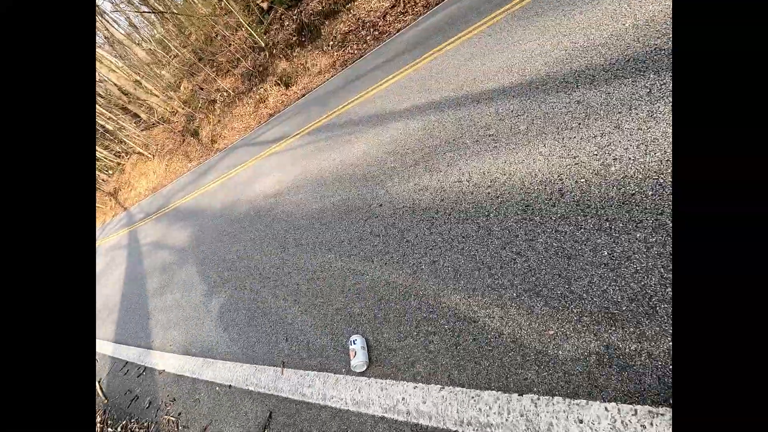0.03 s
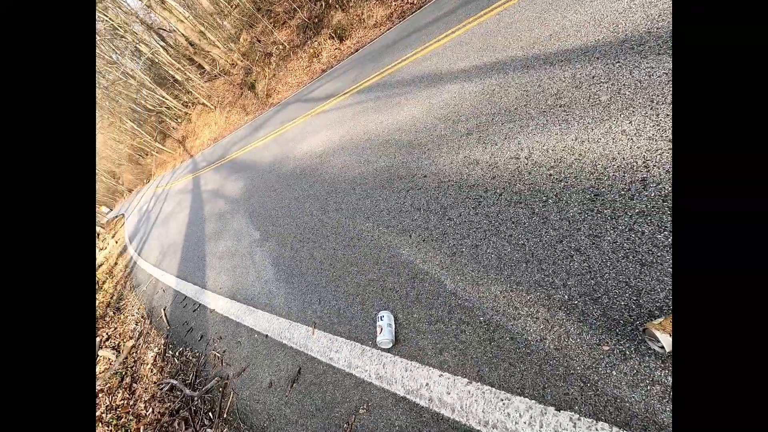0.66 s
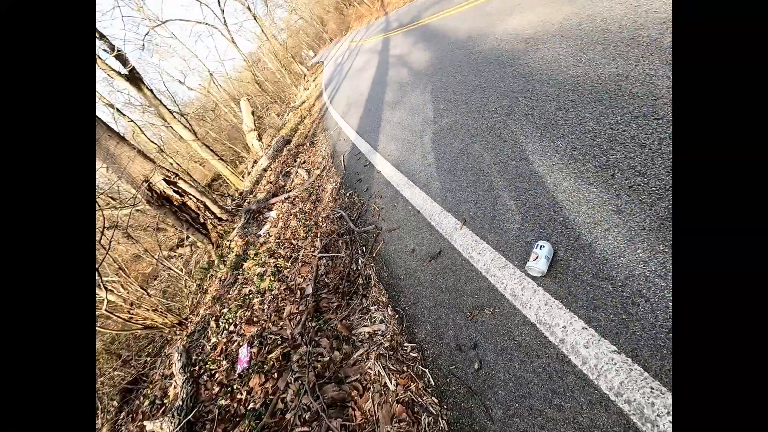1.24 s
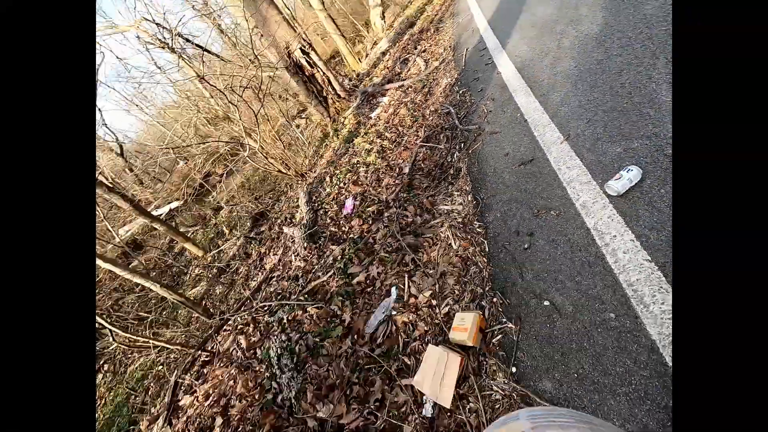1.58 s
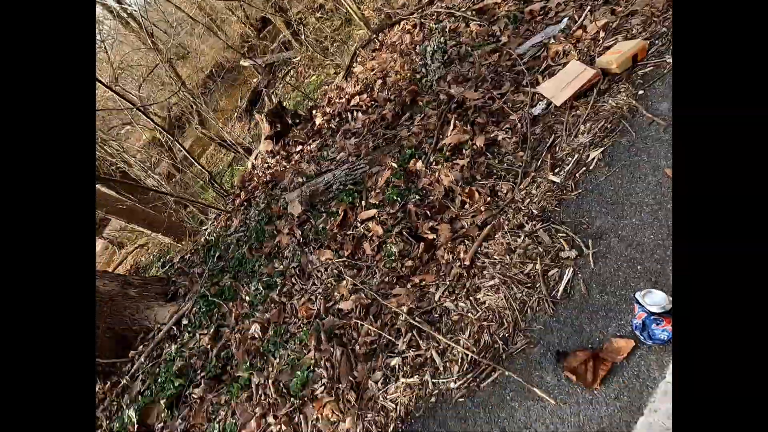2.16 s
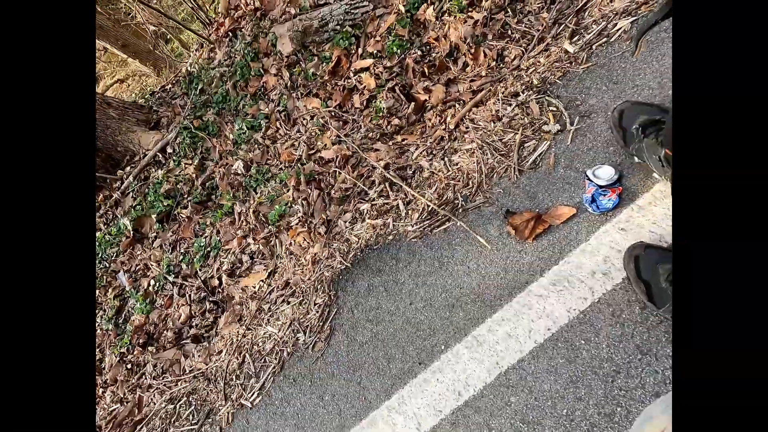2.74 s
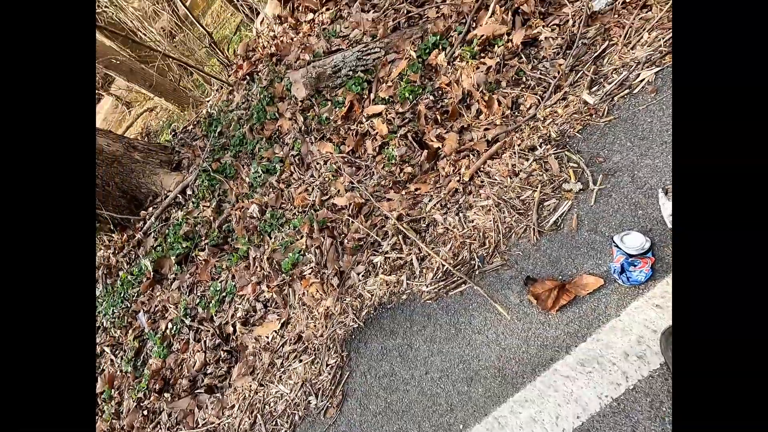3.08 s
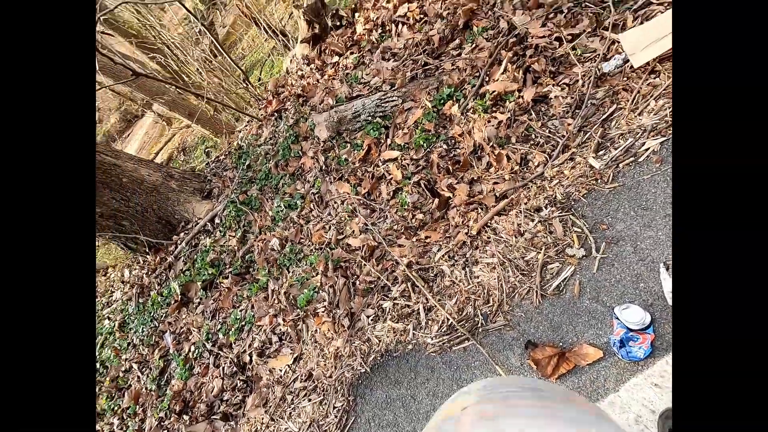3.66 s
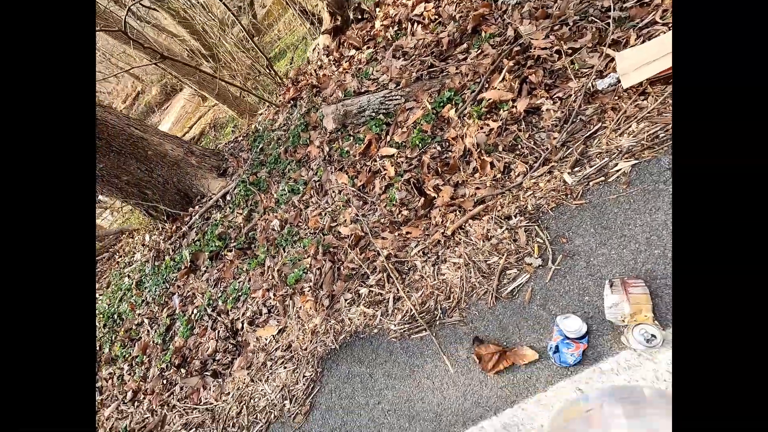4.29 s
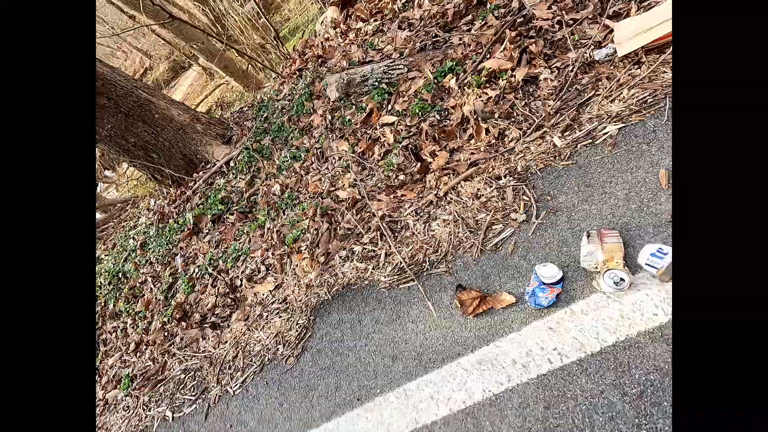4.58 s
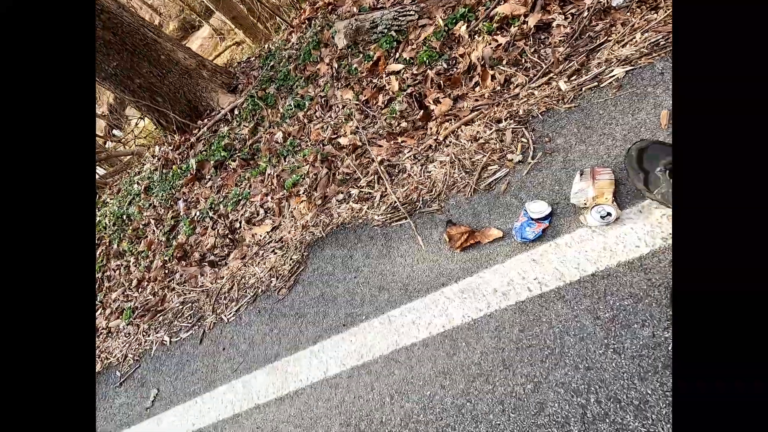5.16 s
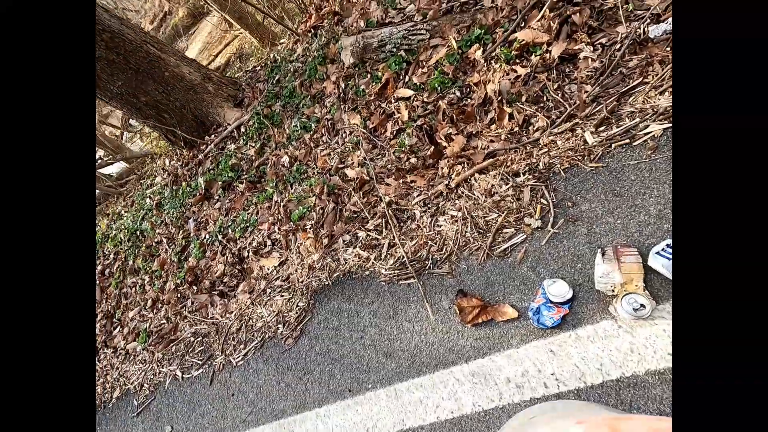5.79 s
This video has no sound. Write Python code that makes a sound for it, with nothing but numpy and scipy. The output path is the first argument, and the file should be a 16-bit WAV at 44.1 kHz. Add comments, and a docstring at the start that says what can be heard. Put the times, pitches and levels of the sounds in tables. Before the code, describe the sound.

On a quiet woodland road, close to the microphone, an empty drink can is kicked and rattles over the asphalt in short tinny bursts, then buckles under a stamping shoe. Another can clonks with a clear hollow tone, rolls and is crushed too, its creased metal ticking as it settles. Gritty shoe scuffs come in between, over a soft wind rumble, faintly ticking leaves and a few distant bird whistles.

```python
"""A shoe thuds and an empty aluminium can clatters along an asphalt road; it is stamped flat, then a
second, rounder can is kicked and stamped. Impacts excite the modes of the thin wall, so each can rings
as it tumbles and rolls; under the shoe it buckles in a burst of snaps, then ticks and settles.
Soles scuff on grit, a light wind rumbles on the microphone, dry leaves tick and a far bird whistles."""
import sys
import numpy as np
from scipy import signal
from scipy.fft import rfft, irfft
from scipy.io import wavfile
from scipy.ndimage import uniform_filter1d

SR = 44100
rng = np.random.default_rng(int(sys.argv[2]) if len(sys.argv) > 2 else 0)


def wav_out(sig):
    """Save sig, one row per channel (or a flat mono array), as 16-bit PCM at SR to the path in sys.argv[1]."""
    wavfile.write(sys.argv[1], SR, np.round(np.clip(np.atleast_2d(sig).T, -1, 1) * 32767).astype(np.int16))


N = 265790

# soles and cans scuffing on grit: start_s, length_s, level_db, body_db, crack_db
GRIT_SCUFFS = [(.002, 0.015, -22, 22.5, -6), (0.58, 0.016, -30.5, 22, -8), (0.74, 0.0086, -34, 7, 6),
               (1.014, 0.024, -29.5, 28, 8.5), (1.471, 0.013, -32, 38, 20), (1.492, 0.12, -50.5, -17, 10),
               (1.605, 0.027, -32, 21.5, -6), (1.807, 0.01, -46, 16, 19), (1.982, 0.011, -40, 34, 11),
               (3.015, 0.049, -32, 15, 11), (3.554, 0.031, -48, 12, -18), (3.967, 0.0065, -40, 6, 31),
               (4.038, .011, -30.5, 40, 10), (4.157, 0.035, -39, 24.5, 1)]
# the foot's weight landing: start_s, level_db, pitch_ratio, ground_push_db
FOOTFALLS = [(.001, -19, 0.61, -17), (0.734, -28, .91, -42), (1.473, -25, 0.8, -45), (2.74, -26, 1.1, -41),
             (2.79, -25, 1.1, -33), (3.002, -5, 1.01, -27), (3.115, -31, 1.1, -31),
             (4.041, -28.5, 1.5, -44), (5.218, -18.5, 1.5, -44)]
# modes of a sole on a flat can: pitch_hz, level_db, t60_s
FOOT_MODES = [(148.2, -8.5, 0.19), (166, -10.5, 0.14), (211.4, 2, 0.11), (574, -14, 0.14),
              (740, -14, 0.075), (950, -11, .11)]
# spectrum of thin aluminium when struck: frequency_hz, level_db
WALL_SPECTRUM = [(60, -16.5), (250, -14.5), (400, -14), (600, -6), (900, 0.5), (1500, 2), (2300, -3),
                 (3500, -7.5), (5000, -14), (7000, -24), (9000, -33.5), (12500, -36.5), (15000, -52.5)]
# part of an impact that differs between the ears: frequency_hz, side_ratio
STEREO_SPREAD = [(100, 0.033), (700, 0.038), (2000, 0.22), (4500, 0.13), (8000, 0.46), (13000, 0.58)]
# clear knocks and snaps of the metal: start_s, level_db, panel_hz, t60_s, crack_db
PANEL_KNOCKS = [(.003, -18, 691, 0.027, 1.5), (.042, -20.5, 2850, 0.049, -15.5),
                (.091, -21, 875, 0.074, -2.5), (.131, -22, 915, 0.066, 5.5), (0.162, -17, 2180, 0.048, 2.5),
                (.206, -28.5, 4030, .033, -9), (.229, -23.5, 682, 0.18, -9),
                (.262, -19.5, 2180, 0.067, -16), (0.29, -25.5, 2620, 0.1, -14),
                (0.318, -29.5, 1440, 0.014, 3), (.361, -33, 2270, 0.053, -5), (.378, -27, 4340, 0.085, -8),
                (.408, -20.5, 2610, 0.1, -20), (.427, -21, 3640, 0.017, 3), (.484, -20.5, 2610, 0.043, 12),
                (.506, -24, 636, 0.063, -8), (0.573, -26.5, 667, 0.055, -15), (.588, -22.5, 716, .04, -6),
                (.618, -24.5, 4000, 0.093, -2), (.702, -16.5, 3540, 0.076, -6.5),
                (.784, -29, 1380, 0.015, 1), (1.053, -20.5, 670, 0.066, -1.5), (1.06, -22, 1550, 0.1, -13),
                (1.115, -37, 2040, .012, -11), (1.148, -28.5, 4120, 0.056, -23),
                (1.207, -38, 1070, 0.016, -9), (1.39, -32.5, 3470, .06, -31), (1.405, -20, 1175, .043, 2.5),
                (1.429, -25.5, 1220, 0.19, -8), (1.472, -23.5, 3090, 0.047, 4.5),
                (2.237, -22.5, 3740, 0.035, 2.5), (2.258, -27, 770, .049, -8),
                (2.287, -31.5, 4460, .042, 7), (2.344, -17.5, 3580, 0.023, 1.5),
                (2.385, -27, 939, 0.071, -13), (2.425, -23, 1150, 0.033, -8),
                (2.444, -28.5, 1130, 0.013, 4), (2.562, -24.5, 940, .033, -23),
                (2.576, -32, 1160, 0.021, -21), (2.607, -19.5, 925, 0.05, -26),
                (2.836, -18.5, 810, 0.022, 6), (2.905, -33, 950, 0.016, 17), (3.078, -29.5, 2370, 0.12, 13),
                (3.115, -23.5, 1415, 0.073, 9), (3.134, -23, 3300, 0.018, 20.5),
                (3.182, -27.5, 2710, 0.092, 12), (3.215, -38, 2100, 0.028, -5),
                (3.232, -40, 1860, 0.021, 1), (3.308, -36, 2130, 0.033, -2), (3.318, -37.5, 2000, .021, -5),
                (4.028, -22.5, 1350, .08, -3), (4.162, -33.5, 864, 0.016, -8),
                (4.752, -21.5, 666, 0.032, -8.5), (4.795, -20, 5000, 0.032, 17), (4.81, -18.5, 840, .05, 1),
                (5.344, -22, 1680, 0.037, 14), (5.353, -34, 1760, 0.023, 16),
                (5.394, -21.5, 1710, 0.036, 7.5), (5.441, -21.5, 1650, 0.017, 16),
                (5.524, -22.5, 1950, 0.067, 3.5), (5.552, -27, 1820, 0.11, 12.5),
                (5.596, -22, 2840, 0.087, 0.5), (5.633, -24, 2180, .057, 12), (5.673, -37, 1750, 0.15, -9)]
# modes of each can: pitch_hz, level_db, t60_s
DENTED_MODES = [(577, -2.5, 0.15), (664, -5, 0.11), (723, -1.5, 0.089), (892, 6.5, 0.11), (991, 2, 0.051),
                (1073, 5, 0.086), (1200, 1, 0.081), (1346, 1, 0.04), (1509, 0.5, 0.095), (1778, 2, 0.04),
                (2130, -12, 0.11), (2570, -13, 0.054), (2850, -12, 0.11), (3240, -12, 0.051),
                (3430, -10.5, 0.015), (4200, -31, .06)]
ROUND_MODES = [(332, -10, 0.16), (651.5, 1, 0.19), (818, -2, 0.34), (954, -11.5, 0.16), (1169, -8.5, 0.14),
               (1239, -5, 0.11), (1554, -15.5, 0.12), (1600, -18, 0.2), (1696, -11.5, 0.14),
               (1890, -26, 0.15), (2040, -27, 0.082), (2420, -23, 0.06), (2800, -16.5, 0.11),
               (3250, -30, 0.14), (4020, -40, 0.052)]
# runs of each can over the road: start_s, length_s, ring_db, rasp_db
DENTED_RUNS = [(.01, .12, -42, -29), (0.162, 0.2, -25, -29.5), (0.402, .13, -20.5, -26),
               (0.569, 0.078, -28, -30), (0.723, 0.14, -40.5, -39.5), (1.043, 0.02, -21.5, -27),
               (1.11, 0.14, -41, -42), (1.381, 0.099, -38, -34.5), (2.242, 0.18, -33.5, -33),
               (2.372, 0.093, -22, -27), (2.459, 0.073, -27.5, -34.5), (2.553, 0.061, -16, -23.5),
               (2.686, 0.11, -28, -32)]
ROUND_RUNS = [(3.923, 0.12, -25, -25.5), (4.131, 0.08, -48, -37.5), (4.757, 0.15, -29.5, -27),
              (4.886, 0.092, -23, -20.5), (4.99, 0.07, -31.5, -28.5), (5.073, .135, -29.5, -34.5),
              (5.211, 0.033, -26, -12)]
# rasp of each can on the road: frequency_hz, level_db
DENTED_RASP_SPECTRUM = [(100, -17), (400, -9.5), (900, -2), (1600, -5), (3000, -3), (5000, -12.5),
                        (8000, -17.5), (12500, -29.5), (15000, -44)]
ROUND_RASP_SPECTRUM = [(100, -23), (400, -11), (900, 9), (1600, 5.5), (2800, 1), (5000, -5), (8000, -24.5),
                       (12500, -35), (15000, -45)]
# strength of the wind on the microphone: time_s, level_db
WIND_LEVEL = [(0, -43), (.4, -51), (1.2, -43.5), (1.9, -37.5), (2.4, -40), (2.8, -44.5), (3.5, -46.5),
              (4.1, -41), (4.6, -41.5), (5.2, -45), (5.6, -51), (6.03, -45.5)]
# spectra of the wind, the hush of the woods and the ticking leaves: frequency_hz, level_db
WIND_SPECTRUM = [(10, -6.5), (25, -6.5), (55, 2), (100, -9), (170, -10), (300, -27.5), (600, -30.5),
                 (2000, -101)]
HUSH_SPECTRUM = [(40, 2), (300, 4.5), (600, 1), (1000, 4), (1600, -2.5), (2500, -9.5), (4000, -14.5),
                 (7000, -22), (8500, -32.5), (12500, -39), (15000, -47)]
LITTER_SPECTRUM = [(200, -6), (800, 1), (2500, -3), (6000, -15), (12000, -30), (15000, -44)]
# folds of a can under the shoe: start_s, length_s, crunch_db, blow_db, hollow_hz, body_db, crack_db
FOLDS = [(.716, 0.022, -18.5, -23.5, 1280, 9, 10), (2.735, 0.018, -16.5, -21, 1700, 16.5, 6),
         (2.769, 0.024, -21, -21, 1248, 22.5, 19), (2.795, .034, -18, -24, 1032, 19.5, 24),
         (2.985, 0.0067, -25.5, -36, 1230, 23, 12), (2.995, .016, -19.5, -25, 1736, 21.5, 12.5),
         (5.218, 0.027, -18, -15, 670, 17.5, 16), (5.245, 0.0068, -20, -23.5, 5300, 23, 19),
         (5.265, 0.038, -18.5, -16, 742, 15, 12), (5.309, 0.026, -19, -20, 920, 5.5, 15.5)]
# a far bird's falling whistles: start_s, length_s, first_hz, last_hz, level_db
BIRD_WHISTLES = [(0.885, 0.11, 3130, 2062, -52), (1.235, 0.09, 2920, 2020, -50.5),
                 (1.589, 0.1, 2810, 2150, -51.5)]
# blows that ring the whole round can: start_s, level_db, favoured_hz, favour_db
ROUND_BLOWS = [(3.935, -38, 827, 8), (4.032, -32, 947, 21), (4.753, -23, 823, 0), (4.81, -18.5, 823, 1.5),
               (4.868, -41, 646, 11.5), (5.076, -35, 823, 0)]
# where the cans lie: time_s, left_minus_right_db
CAN_BEARING = [(0, -0.5), (1.2, -1.5), (2.3, -3), (2.8, -3), (3.05, -2), (4.1, -0.3), (4.8, -3.6),
               (5.3, -3.5), (5.599, -4.5)]
# level difference of the microphone ports: frequency_hz, left_minus_right_db
PORT_LEVEL_GAP = [(60, 0.5), (110, -1), (200, 1), (370, 1), (680, 1), (1250, 0), (2300, 0), (4230, 0),
                  (7760, 0.5), (14200, 4.5)]
# phase difference of the ports: frequency_hz, left_minus_right_rad
PORT_PHASE_GAP = [(50, 0.21), (500, -0.26), (1000, -0.17), (2000, -0.35), (3500, -0.83), (4700, -0.63),
                  (6600, -0.76), (7900, 1), (9500, 0.47), (14000, 0)]

FLATTENED_S = 2.77  # the dented can stops ringing as a whole
BURST_SAMPLES = 7000
BODY_DB, BODY_DB_PER_OCTAVE, BODY_AT_HZ = 5, -3.5, 1040
SNAP_DB, SNAP_T60 = -0.5, 0.014  # the wall's first, violent flexing, relative to its shiver
SHIMMER_DB, SHIMMER_T60, SHIMMER_HZ = -22, 0.24, 4500  # the duller, longer tail of a knock
FACET_DB, FACET_HZ, FACET_CYCLES = -17.5, (1102, 5197), 145  # small faces between the dents
GRAZE_S, GRAZE_DB, GRAZE_T60, GRAZE_CRACK_DB = 0.006, -19, 0.037, -11  # a touch just before a strike
ROLL_RISE_S, ROLL_SAG_DB_PER_S, ROLL_STOP_DB_PER_S = 0.014, 28, 255
RATTLES_PER_S, RATTLE_HZ, RATTLE_DB, RATTLE_SPREAD_DB = 26, (1190, 4430), -5, 2
FOLD_T60, FOLD_CRACK_DB = 0.082, -15.5  # the blow that starts a fold is duller than its crunch
CREAK_S, CREAK_DB, CREAK_BODY_DB, CREAK_CRACK_DB = 0.058, -25, -23, -1.5  # creases tick after a fold


def amp(db):
    """Amplitude ratio of a level in decibels."""
    return 10 ** (np.asarray(db) / 20)


def unit(x):
    """Normalisation to rms 1."""
    return x / np.sqrt(np.mean(x ** 2) + 1e-20)


def read(points, hz):
    """Interpolation of a spectrum on a log-frequency axis."""
    f, value = np.transpose(points)
    return np.interp(np.log(hz + 1), np.log(f + 1), value)


def over_time(curve):
    """Linear interpolation of a curve at every sample."""
    return np.interp(np.arange(N) / SR, *np.transpose(curve))


def add(mix, s, sound):
    """Superposition: a sound joins the mix at time s."""
    part = mix[..., max(0, round(s * SR)):][..., :sound.shape[-1]]
    part += sound[..., :part.shape[-1]]


def coloured(x, spectrum):
    """Spectral shaping of a long signal, at rms 1."""
    return unit(irfft(rfft(x) * amp(read(spectrum, np.fft.rfftfreq(N, 1 / SR))), N))


def dull(x, hz):
    """First-order low-pass filter."""
    keep = np.exp(-2 * np.pi * hz / SR)
    return signal.lfilter([1 - keep], [1, -keep], x)


def flutter(n, hz):
    """Smooth random modulation of rms 1 and bandwidth about hz."""
    smoothing = np.exp(-(np.fft.rfftfreq(n, 1 / SR) / hz) ** 2)
    return unit(irfft(rfft(rng.standard_normal(n)) * smoothing, n))


def grains(n, per_s, spread_db):
    """Poisson process of tiny impacts of unequal size."""
    size = amp(spread_db * np.minimum(rng.exponential(1, n), 4))
    return size * rng.choice([-1, 1], n) * (rng.random(n) < per_s / SR)


def mode(hz, t60):
    """Free vibration of a damped oscillator."""
    t = np.arange(SR // 2) / SR
    return amp(-60 * t / t60) * np.sin(2 * np.pi * hz * t)


def crunch(length, per_s, spread_db, fade_s, hiss, sharp=0.55):
    """Shot noise: snaps go on while the shoe presses, each leaving a brief shiver."""
    t = np.arange(BURST_SAMPLES) / SR
    press = np.minimum(t / 0.0014, 1) * np.exp(-np.maximum(t - length, 0) / fade_s)
    snaps = np.array([unit(grains(len(t), per_s, spread_db)) for ear in range(2)])
    shiver = np.sqrt(dull(snaps ** 2, 210))
    return press * (sharp * snaps + (shiver + hiss) * rng.standard_normal(snaps.shape))


def shell(drive, body_db, crack_db, panel_hz=1000, panel_db=0, panel_octaves=0.39, size=8192):
    """Source and filter: the wall colours a blow; heavy ones add bass body, sharp ones treble crack."""
    hz = np.abs(np.fft.fftfreq(size, 1 / SR))
    db = read(WALL_SPECTRUM, hz) + body_db * read([(400, 1), (1600, 0)], hz)
    db += crack_db * read([(2000, 0), (8000, 1)], hz)
    db += panel_db * np.exp(-(np.log2((hz + 1) / panel_hz) / panel_octaves) ** 2)  # one resonance
    spectrum = np.fft.fft(drive, size)
    power = uniform_filter1d(abs(spectrum) ** 2, size=160, mode="wrap")
    db = db - 10 * np.log10(power + 1e-12)  # short blows are broadly white
    response = np.exp(np.conj(signal.hilbert(db * np.log(10) / 20)))  # minimum phase: follows the blow
    mid, side = spectrum * response
    side = side * read(STEREO_SPREAD, hz)
    return np.fft.ifft([mid + side, mid - side]).real / np.linalg.norm(np.fft.ifft(mid))


def shoes(rise_s=0.01):
    """Friction on grit makes the scuffs; the landing weight excites low, damped modes."""
    out = np.zeros((2, N))
    for s, length, db, body_db, crack_db in GRIT_SCUFFS:
        grit = crunch(length, per_s=1500, spread_db=4.5, fade_s=0.0057, hiss=0.49)
        add(out, s, amp(db) * np.sqrt(length * SR) * shell(grit, body_db, crack_db))
    for s, db, pitch, push_db in FOOTFALLS:
        add(out, s, amp(push_db) * mode(hz=52, t60=0.082))  # dull push through the ground
        thud = sum(amp(mode_db) * mode(hz * pitch, t60) for hz, mode_db, t60 in FOOT_MODES)
        onset = np.minimum(np.arange(len(thud)) / SR / rise_s, 1)
        add(out, s, amp(db) * thud * onset)
    return out


def panel_body(hz):
    """Radiation efficiency: large, low panels push more air, so their knocks gain bass (dB)."""
    return BODY_DB + BODY_DB_PER_OCTAVE * np.log2(hz / BODY_AT_HZ)


def knock(db, hz, t60, crack_db, body_db, rise_s=0.00061, ping_db=-7, ping_cycles=65):
    """Impulse response of the wall: dense modes decay as noise; the panel and nearby facets ping."""
    t = np.arange(BURST_SAMPLES) / SR
    quick, slow = rng.standard_normal((2, 2, len(t)))
    shiver = quick * (amp(-60 * t / t60) + amp(SNAP_DB - 60 * t / SNAP_T60))
    shimmer = dull(slow, SHIMMER_HZ) * amp(SHIMMER_DB - 60 * t / SHIMMER_T60)
    drive = (shiver + shimmer) * np.minimum(t / rise_s, 1)
    drive[0, 0] += 3  # impulse of first contact
    out = shell(drive, body_db, crack_db, hz, panel_db=8)
    low, high = FACET_HZ
    facets = [(low * (high / low) ** u, FACET_DB, FACET_CYCLES) for u in rng.random(3)]
    for ping_hz, share_db, cycles in [(hz, ping_db, ping_cycles)] + facets:
        ping = mode(ping_hz, min(cycles / ping_hz, 2 * t60))  # small panels die sooner
        add(out, 0, amp(share_db) * ping / np.linalg.norm(ping))
    return amp(db) * np.sqrt(0.0062 * SR) * out


def knocks():
    """Impact excitation: the cans hit the road, and creased panels spring back."""
    out = np.zeros((2, N))
    for s, db, hz, t60, crack_db in PANEL_KNOCKS:
        add(out, s, knock(db, hz, t60, crack_db, panel_body(hz)))
        if s < FLATTENED_S:
            graze = knock(db + GRAZE_DB, hz, GRAZE_T60, GRAZE_CRACK_DB, panel_body(hz), rise_s=0.0014)
            add(out, s - GRAZE_S, graze)
    return out


def struck(modes, blows, scatter_db=2):
    """Modal superposition: a blow rings every mode, and the spot hit favours those near one pitch."""
    out = np.zeros(N)
    for s, db, spot_hz, favour_db in blows:
        for k, (hz, mode_db, t60) in enumerate(modes):
            nearness = np.exp(-(np.log2(hz / spot_hz) / 0.035) ** 2)
            gain = amp(db + mode_db + favour_db * nearness + scatter_db * rng.standard_normal())
            add(out, s, (-1) ** k * gain * mode(hz, t60))
    return out


def run_envelopes(runs):
    """Frictional decay: in each run the ring and the rasp pick up quickly, sag and stop."""
    power = np.zeros((2, N))
    for s, length, ring_db, rasp_db in runs:
        t = np.arange(int((length + 0.4) * SR)) / SR
        loss_db = ROLL_SAG_DB_PER_S * t + ROLL_STOP_DB_PER_S * np.maximum(t - length, 0)
        speed = np.minimum(t / ROLL_RISE_S, 1) * amp(-loss_db)
        add(power, s, (amp([[ring_db], [rasp_db]]) * speed) ** 2)
    return np.sqrt(power)


def rolling(modes, runs, rasp_spectrum, rasp_gain_db, taps_per_s, ring_gain_db=-7):
    """Random forcing: road grains tap the turning can, so its modes hum and the contact rasps."""
    bumps = amp(3 * (flutter(N, hz=90) - 0.5))  # the taps come in uneven clumps
    push, scrape = run_envelopes(runs) * bumps
    taps = unit(grains(N, taps_per_s, spread_db=2.5))
    hum = np.zeros(N)
    for hz, db, t60 in modes:
        ring = mode(hz, t60)
        force = push * taps * rng.standard_normal(N)
        hum += amp(db) * signal.oaconvolve(force, ring / np.linalg.norm(ring))[:N]
    hum /= np.linalg.norm(amp(np.transpose(modes)[1]))
    t = np.arange(SR // 2) / SR
    wall = rng.standard_normal(len(t)) * amp(-60 * t / 0.0036)  # crowded high modes, quickly gone
    grit = unit(signal.oaconvolve(taps, wall)[:N])
    rasp = np.array([coloured(grit + 0.41 * rng.standard_normal(N), rasp_spectrum) for ear in range(2)])
    return amp(ring_gain_db) * hum + amp(rasp_gain_db) * scrape * rasp


def dented_can(ring_db=-20):
    """Damped resonance: the first can rolls and rings with every knock until it is flattened."""
    blows = [(s, db + ring_db, hz, 0) for s, db, hz, *_ in PANEL_KNOCKS if s < FLATTENED_S]
    ring = struck(DENTED_MODES, blows)
    roll = rolling(DENTED_MODES, DENTED_RUNS, DENTED_RASP_SPECTRUM, rasp_gain_db=-16.5, taps_per_s=2500)
    return ring + roll


def rattle(most_taps=8):
    """Intermittent contact: the rolling can's dents catch the road in small, uneven taps."""
    out = np.zeros((2, N))
    low, high = RATTLE_HZ
    for s, length, _, rasp_db in DENTED_RUNS:
        for k, (late, softness, panel) in enumerate(rng.random((most_taps, 3))):
            delay_s = (k + late) / RATTLES_PER_S
            hz = low * (high / low) ** panel
            db = rasp_db + RATTLE_DB + RATTLE_SPREAD_DB * (1 - 2 * softness)
            if delay_s < length:
                add(out, s + delay_s, knock(db, hz, t60=0.038, crack_db=-3, body_db=panel_body(hz)))
    return out


def wind_and_hush(hush_db=-55):
    """Turbulence rumbles on the microphone over the broadband hush of the woods."""
    ears = np.array([[1], [-1]])
    wind_mid, wind_side, hush_mid, hush_side = rng.standard_normal((4, N))
    rumble = coloured(wind_mid + 0.18 * ears * wind_side, WIND_SPECTRUM)
    hush = coloured(hush_mid + 0.28 * ears * hush_side, HUSH_SPECTRUM)
    return amp(over_time(WIND_LEVEL)) * rumble + amp(hush_db + 0.39 * flutter(N, hz=39)) * hush


def litter(db=-68, t60=0.02):
    """Sparse shot noise: dry leaves and grit tick faintly at the roadside."""
    t = np.arange(SR // 8) / SR
    ticks = grains(N, per_s=31, spread_db=4)
    tails = rng.standard_normal((2, len(t))) * amp(-60 * t / t60)
    mid, side = (coloured(signal.oaconvolve(ticks, tail)[:N], LITTER_SPECTRUM) for tail in tails)
    return amp(db) * np.array([mid + 0.2 * side, mid - 0.48 * side])


def crushing(hollow_db=10):
    """Buckling: each fold is a blow, then snaps that resonate in the remaining hollow, then a creak."""
    out = np.zeros((2, N))
    for s, length, db, blow_db, hz, body_db, crack_db in FOLDS:
        add(out, s, knock(blow_db, hz, FOLD_T60, crack_db + FOLD_CRACK_DB, body_db))
        snaps = crunch(length, per_s=780, spread_db=1.5, fade_s=0.0052, hiss=0.32)
        add(out, s, amp(db) * np.sqrt(length * SR) * shell(snaps, body_db, crack_db, hz, hollow_db))
        ticks = crunch(CREAK_S, per_s=300, spread_db=5, fade_s=0.024, hiss=0.16)
        creak = shell(ticks, body_db + CREAK_BODY_DB, crack_db + CREAK_CRACK_DB)
        add(out, s + length, amp(db + CREAK_DB) * np.sqrt(CREAK_S * SR) * creak)
    return out


def bird():
    """Frequency glide: near-sine whistles slide down and waver on their way through the trees."""
    out = np.zeros((2, N))
    for s, length, first_hz, last_hz, db in BIRD_WHISTLES:
        hz = np.geomspace(first_hz, last_hz, int(length * SR))
        tone = np.sin(2 * np.pi * np.cumsum(hz) / SR)
        waver = amp(3 * flutter(len(hz), 70) - 2)
        add(out, s, amp(db) * waver * signal.windows.tukey(len(hz), 0.9) * tone)
    return out + trees(out, wet_db=-12)


def round_can():
    """Lightly damped resonance: still hollow, the second can clonks and rolls with a clear tone."""
    ring = struck(ROUND_MODES, ROUND_BLOWS)
    roll = rolling(ROUND_MODES, ROUND_RUNS, ROUND_RASP_SPECTRUM, rasp_gain_db=-14.5, taps_per_s=1500)
    return ring + roll


def trees(x, wet_db, t60=0.75, top_hz=5000, build_s=0.042):
    """Scattering: trunks and bank return a dull reverberant tail."""
    t = np.arange(SR) / SR
    tail = dull(rng.standard_normal((2, len(t))), top_hz) * amp(-60 * t / t60)
    tail *= np.minimum(t / build_s, 1)
    return amp(wet_db) * signal.fftconvolve(x, tail / np.linalg.norm(tail[0]), axes=1)[:, :N]


def scene():
    """Superposition of the woods and the nearby cans and shoes, placed by interaural level difference."""
    woods = bird() + wind_and_hush() + litter()
    near = knocks() + dented_can() + round_can() + crushing() + shoes() + rattle()
    lean_db = over_time(CAN_BEARING)
    near = near * amp([lean_db / 2, -lean_db / 2])
    return near + trees(near, wet_db=-30.5) + woods


def record(dry, ceiling=0.58, edge_hz=15000):
    """Transduction: two ports differ in level and phase, peaks saturate softly, the band is limited."""
    hz = np.fft.rfftfreq(N, 1 / SR)
    port = amp(read(PORT_LEVEL_GAP, hz) / 2) * np.exp(0.5j * read(PORT_PHASE_GAP, hz))
    heard = irfft(rfft(dry) * np.array([port, 1 / port]), N)
    rounded = heard / (1 + (heard / ceiling) ** 4) ** (1 / 4)
    low_pass = signal.firwin(255, edge_hz, window=("kaiser", 8), fs=SR)
    return signal.oaconvolve(rounded, low_pass[None], "same")


dry = scene()
out = record(dry)
wav_out(out)
```